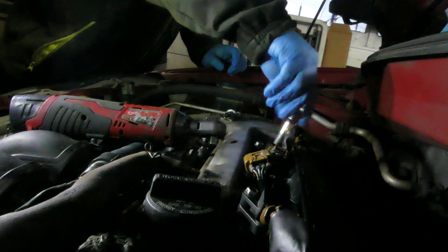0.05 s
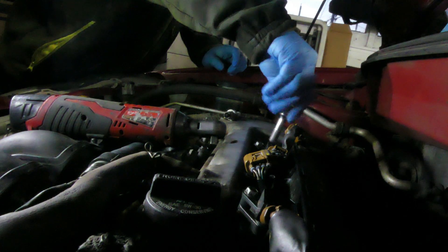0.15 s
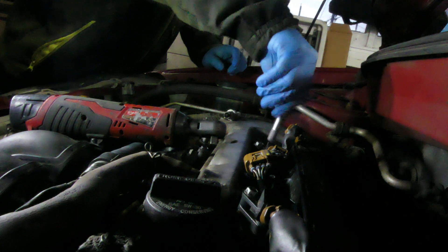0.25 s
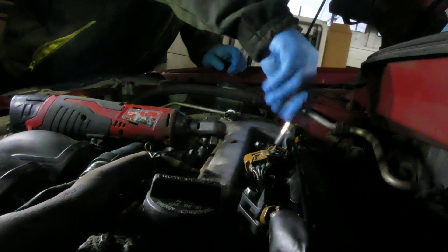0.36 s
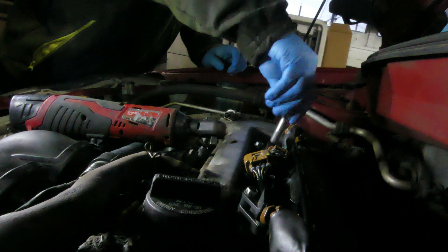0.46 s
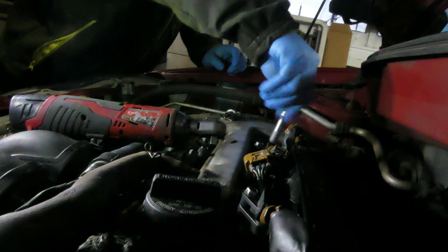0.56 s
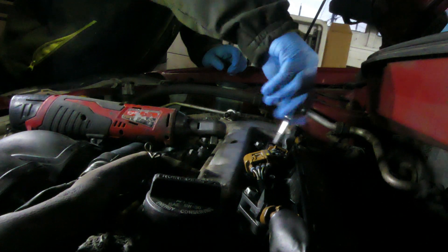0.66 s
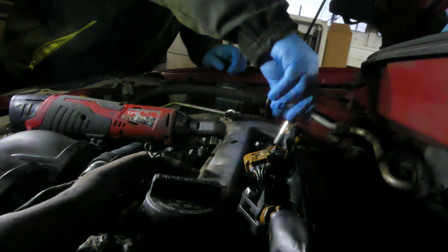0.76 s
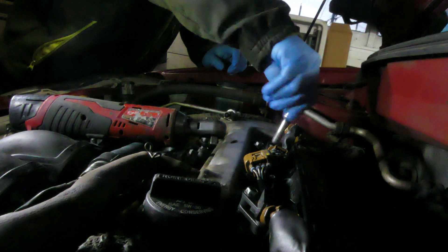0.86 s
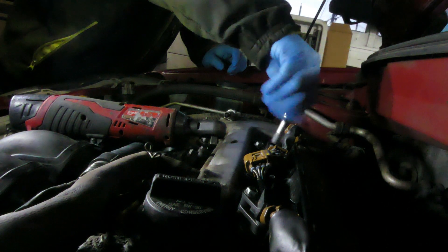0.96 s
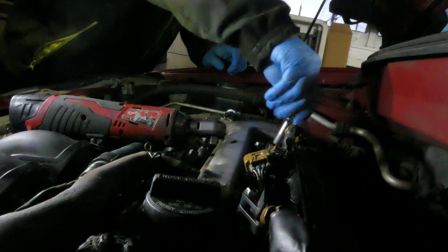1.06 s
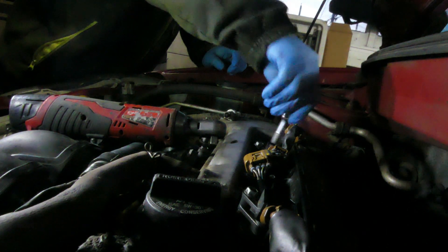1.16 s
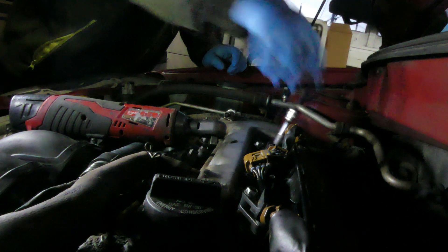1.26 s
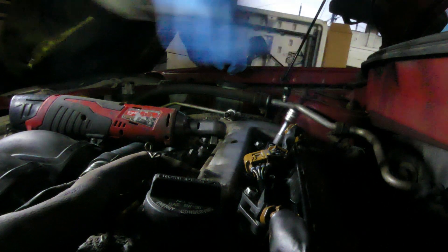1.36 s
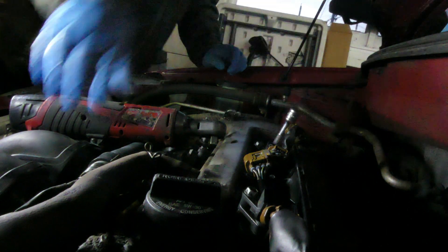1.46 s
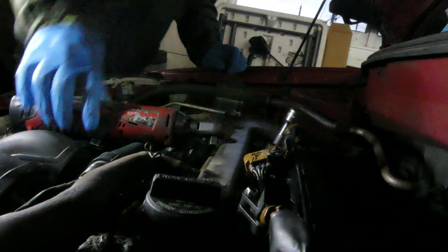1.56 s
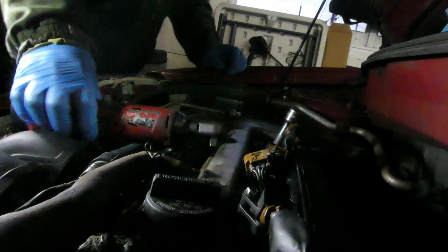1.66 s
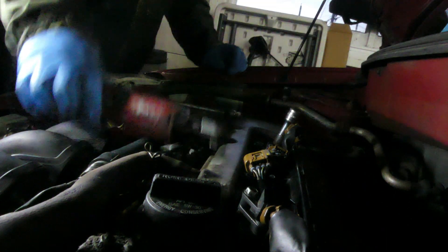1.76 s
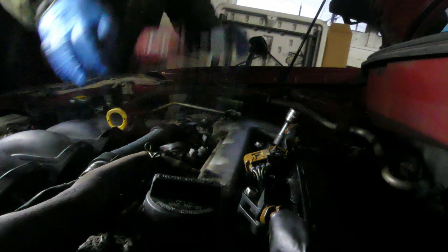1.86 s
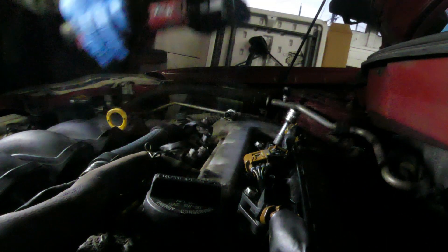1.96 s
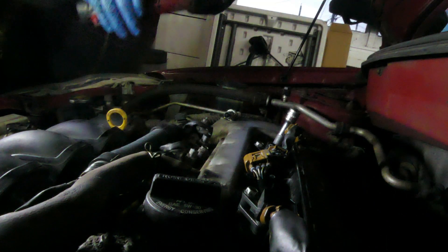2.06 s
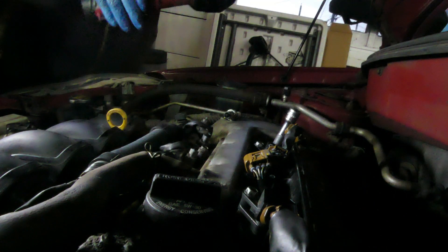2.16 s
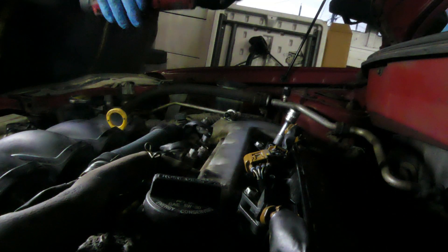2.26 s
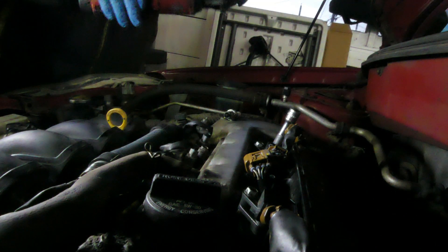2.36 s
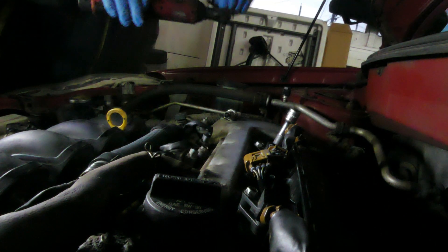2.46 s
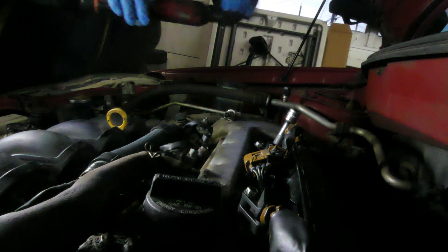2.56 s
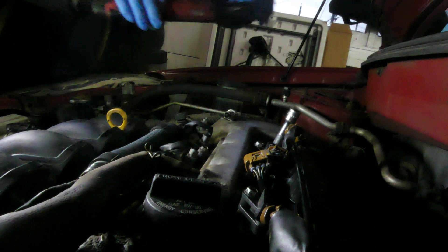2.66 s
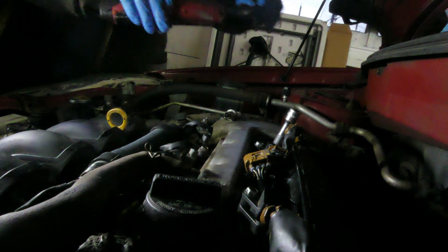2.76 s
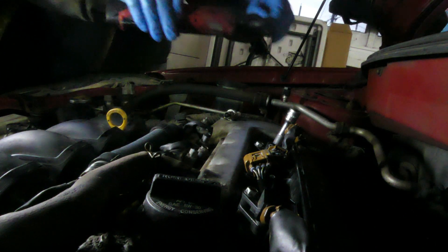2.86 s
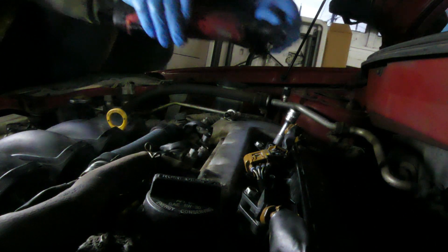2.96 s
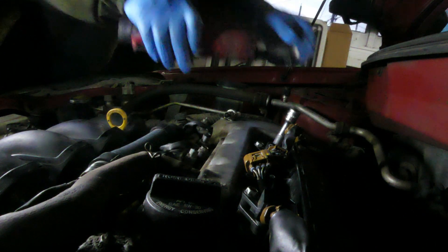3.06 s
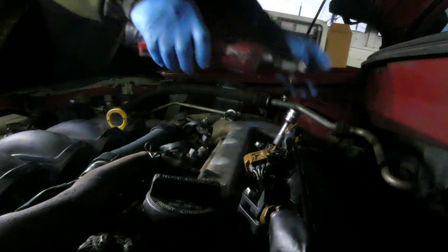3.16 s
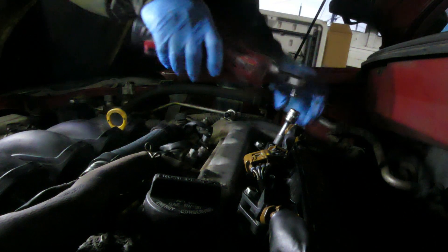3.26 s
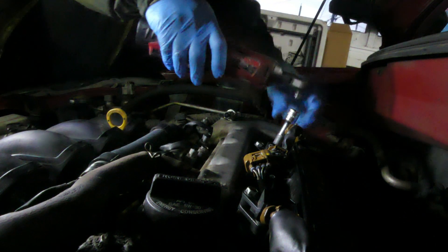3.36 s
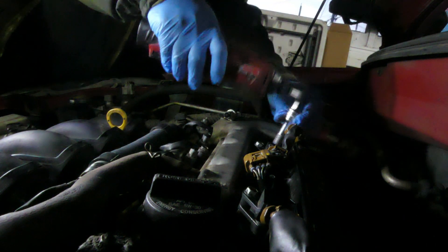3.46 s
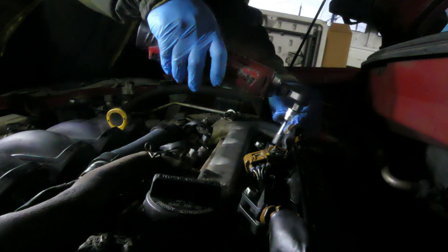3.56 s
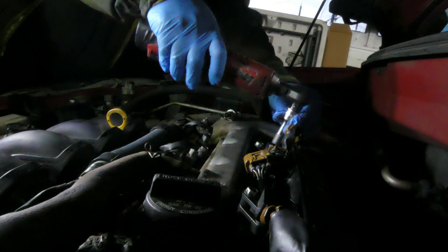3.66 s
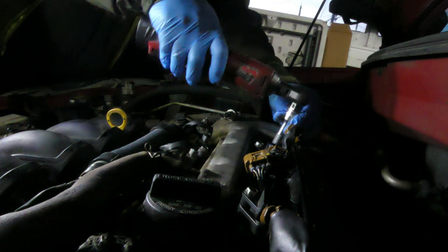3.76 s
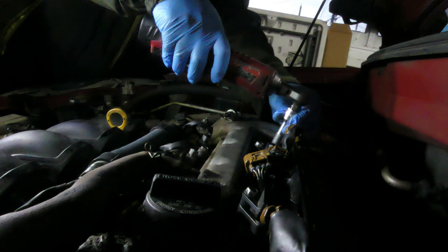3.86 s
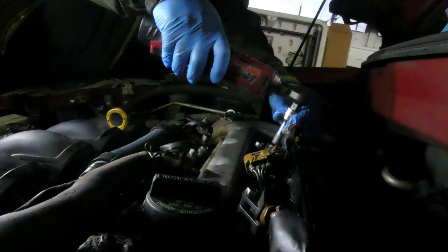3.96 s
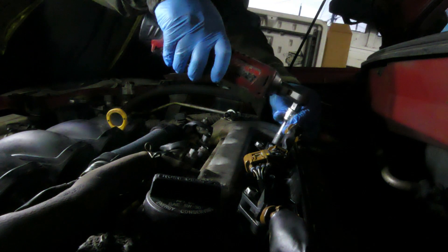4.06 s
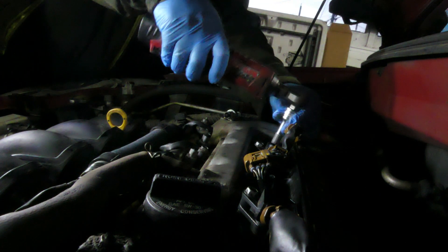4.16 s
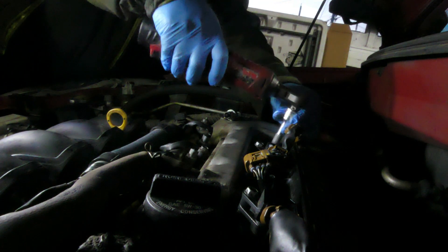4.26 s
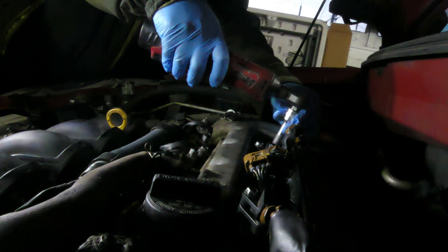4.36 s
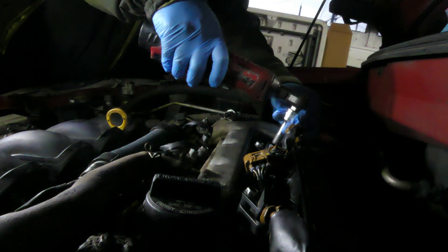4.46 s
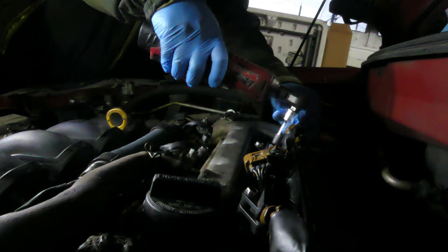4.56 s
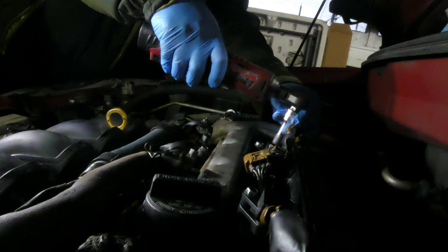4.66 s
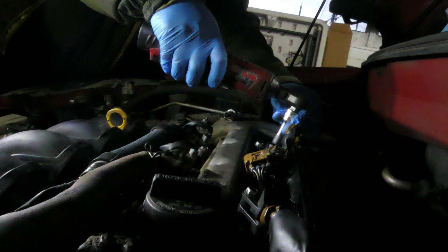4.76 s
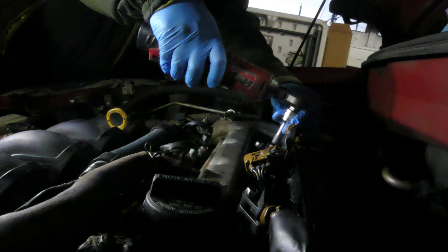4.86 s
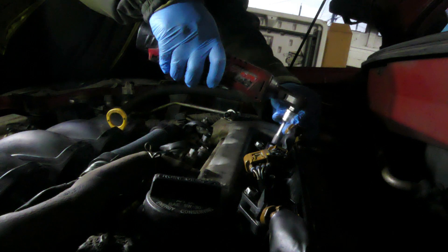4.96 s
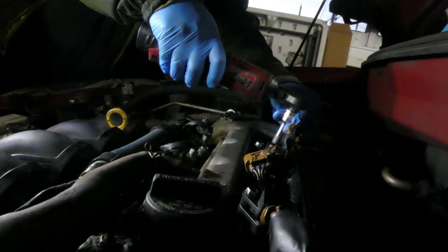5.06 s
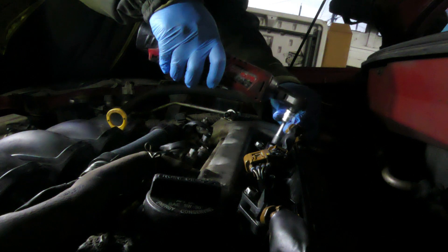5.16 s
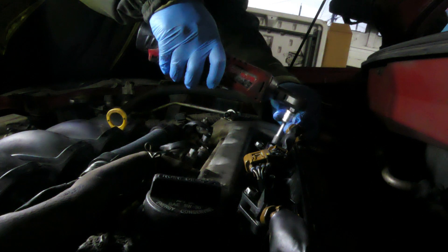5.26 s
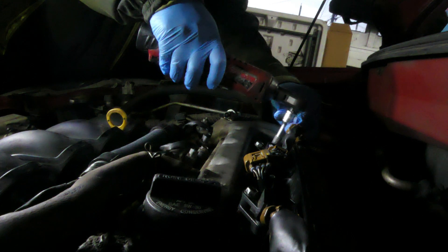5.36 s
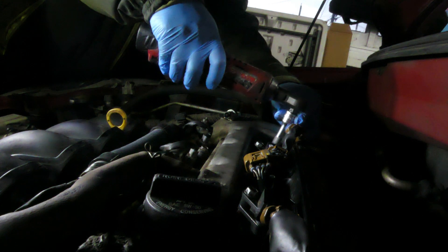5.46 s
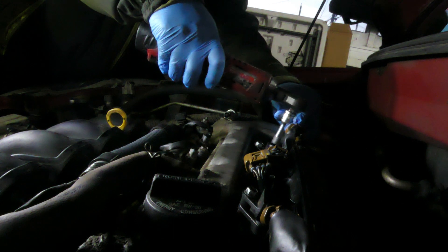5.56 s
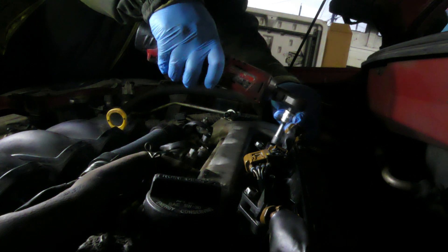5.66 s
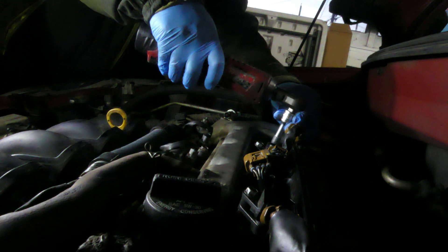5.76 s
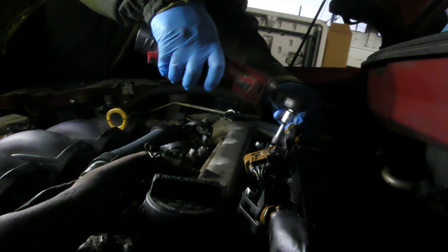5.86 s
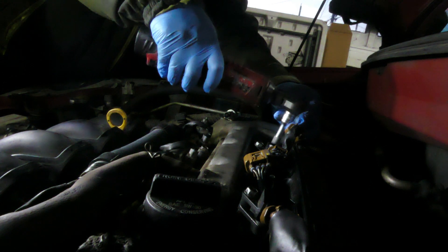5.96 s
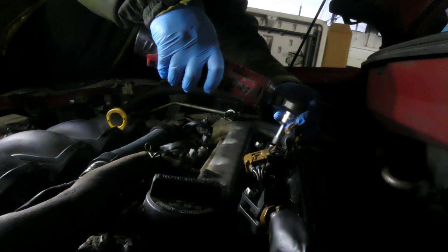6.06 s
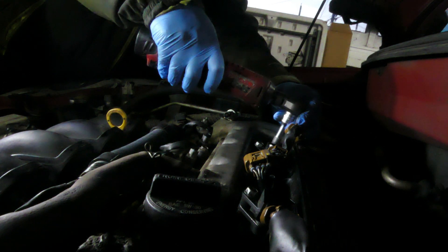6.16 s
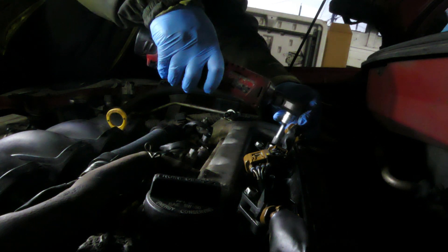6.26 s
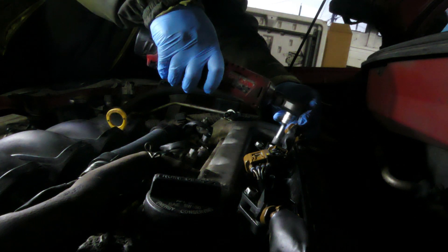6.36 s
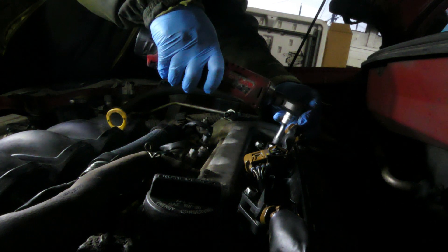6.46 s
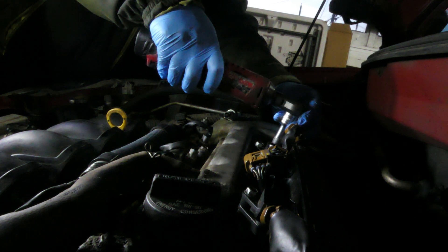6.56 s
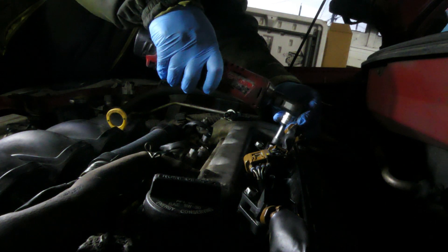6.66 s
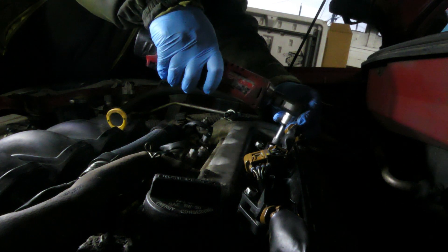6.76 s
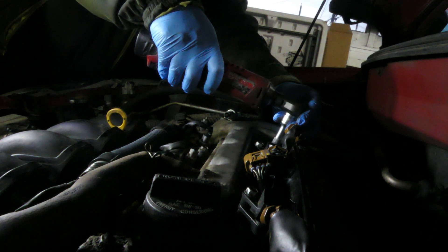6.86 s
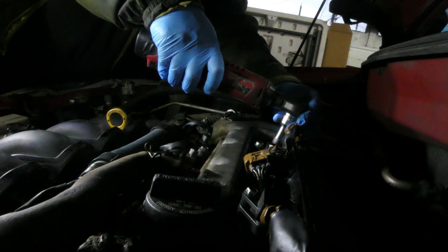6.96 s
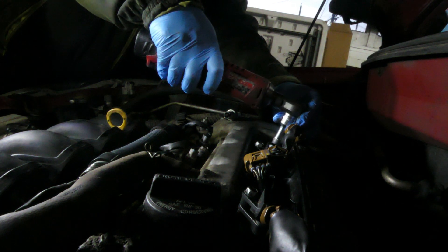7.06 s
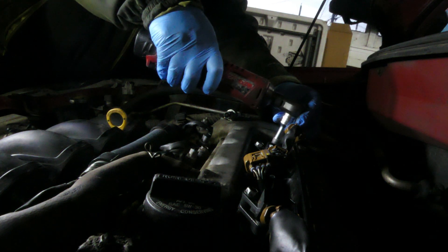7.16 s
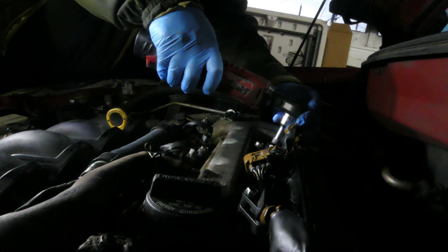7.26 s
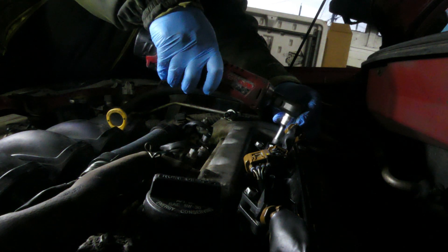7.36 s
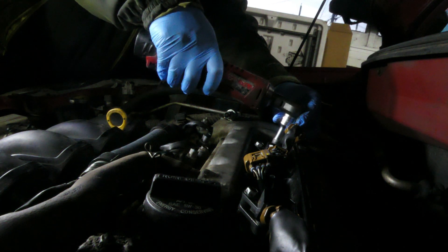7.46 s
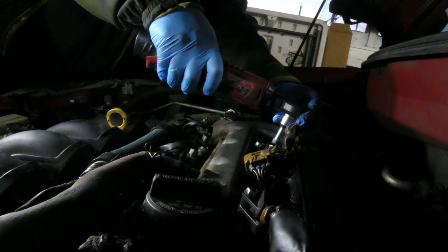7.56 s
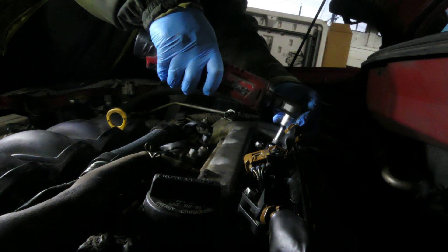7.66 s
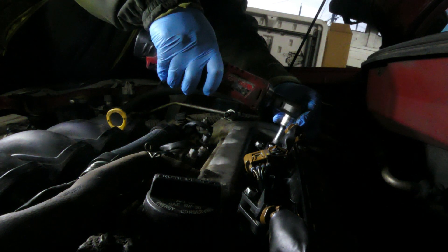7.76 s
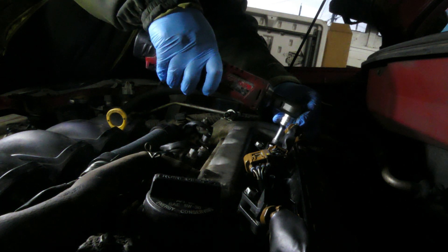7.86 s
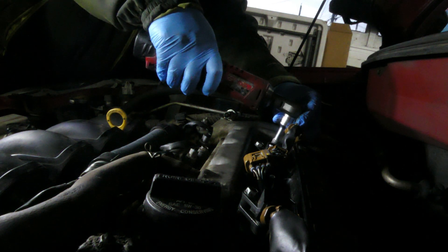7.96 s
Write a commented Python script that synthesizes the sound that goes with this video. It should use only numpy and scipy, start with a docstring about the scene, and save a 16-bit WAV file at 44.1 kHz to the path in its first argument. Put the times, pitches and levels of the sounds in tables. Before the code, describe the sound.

In a close garage engine bay, small metal taps give way to a handled power tool, a brief spin, then rattling, clicking ratchet drive.

```python
"""An engine bay in a garage: a spark plug is started by hand, then driven in by a cordless ratchet.
The socket extension clinks in its well as short steel rings; knocks, rubs and bumps are shaped noise and low notes.
The ratchet spins free and coasts to a stop, then drives the plug at a speed that follows the trigger finger.
Each crank turn clicks the pawl twice and jerks the extension, over grinding grains and whining motor orders.
Close reflections and a faint garage tail surround it all, over steady air noise."""
import sys
import numpy as np
from scipy import signal
from scipy.fft import rfft, irfft
from scipy.io import wavfile
from scipy.ndimage import uniform_filter1d

SR = 44100
rng = np.random.default_rng(int(sys.argv[2]) if len(sys.argv) > 2 else 0)


def pcm_store(signal):
    """Save signal as 16-bit PCM."""
    levels = np.round(np.clip(np.atleast_2d(signal), -1, 1) * 32767)
    wavfile.write(sys.argv[1], SR, levels.astype(np.int16).T)


N = 352800
T = np.arange(N) / SR
HZ = np.fft.rfftfreq(N, 1 / SR)

# moves of the trigger finger: (time [s], speed asked for, 0 when let go [crank turns/s], settling time [s])
TRIGGER_MOVES = [(3.2296, 73.3078, 0.0115), (3.336, 0.0, 1.0089), (4.1153, 78.85, 0.0451),
                 (4.2843, 0.0, 1.3228), (4.643, 60.724, 0.136), (5.1504, 45.095, 0.1741),
                 (5.2823, 0.0, 0.8363), (5.6154, 46.989, 0.0903), (5.9144, 49.361, 0.0898),
                 (6.161, 38.418, 0.1336), (6.6082, 37.605, 0.1314), (6.9089, 54.332, 0.1375),
                 (7.5054, 51.134, 0.0494), (7.8585, 48.3, 0.1003)]
# pawl clicks, swelling and easing: (time [s], relative level [dB])
PAWL_LEVEL_CURVE = [(3.24, -4), (3.26, 6.5), (3.43, 2), (3.62, -1), (3.73, 1), (3.83, -2), (3.88, 5),
                    (4.0, 0), (4.2, 0), (4.5, -5), (4.7, 2.5), (4.95, -6.5), (5.1, 1.5), (5.3, -6),
                    (5.55, -2.5), (5.65, -1), (6.4, -2), (7.1, 0), (8, -2)]
# the pawl snaps over as the direction is set: (time [s], relative level [dB])
DIRECTION_SNAP = (2.924, -1.6)
# colour of the pawl's ticks: (frequency [Hz], relative density [dB per Hz])
TICK_SPECTRUM = [(200, -57), (1000, -29), (4000, -31), (6200, -17), (8000, -25), (11700, -11), (12500, 1.5),
                 (13150, 2), (13800, -7), (16000, -18)]
# colour of the grinding gears: (frequency [Hz], relative density [dB per Hz])
GEAR_SPECTRUM = [(60, -36), (150, -21.5), (480, -8), (650, 0.5), (850, 6.5), (1130, -3.5), (1400, 4),
                 (2200, -3), (3500, 5), (5000, 3), (10000, 3.5), (15500, -2.5)]
# grinding as the thread runs freer or stiffer: (time [s], relative level [dB])
THREAD_GRINDING = [(4.5, 2.5), (5.0, -1), (5.8, 2.5), (6.3, 1.5), (7.4, 0.5), (7.9, 2)]
# colour of the jerks: (frequency [Hz], relative density [dB per Hz])
JOLT_SPECTRUM = [(100, -30), (400, -17), (800, -1.5), (1150, -5.5), (1900, -1.5), (2900, -2), (4000, 5.5),
                 (5100, -6), (6500, 15.5), (7600, -1), (11500, 8), (13200, 14), (15500, 3)]
# resonances of the tool housing: (frequency [Hz], width [Hz], boost [dB])
HOUSING_MODES = [(658, 17, 3), (1940, 260, 4), (2500, 170, 5.5)]
# resonances of the extension under load: (frequency before wobble [Hz], width [Hz], relative level [dB])
EXTENSION_MODES = [(5742, 177, 2), (6340, 300, -5), (6960, 370, -6), (8070, 100, -12.5)]
# motor whine: (multiple of shaft speed [1], relative level spinning free [dB], relative level driving [dB])
WHINE_ORDERS = [(3, -42.5, -48), (12, -41.5, -50)]
# how well the housing radiates the whine: (frequency [Hz], gain [dB])
WHINE_RADIATION = [(330, -26), (480, -11), (640, 0), (780, 4), (950, -5), (1200, -9), (1550, 3), (2000, -8),
                   (2350, -3), (2750, -7), (3200, 4), (3700, -6)]
# the speed controller sings as the rotor is about to move: (time [s], length [s], level of each tone [dB])
CONTROLLER_SQUEALS = [(3.194, 0.036, -42.5), (4.09, 0.029, -49)]
# the extension clinks in the plug well, each time at another spot: (time [s], low ring [Hz],
# low ring relative level [dB], body relative level [dB], top ring [Hz], top ring relative level [dB])
WELL_CLINKS = [(0.1, 5960, -51, -52.5, 7000, -60), (0.173, 5660, -50, -51, 6920, -59),
               (0.3012, 5730, -47.5, -66, 6520, -64), (0.398, 5800, -48, -50, 7130, -53),
               (0.4483, 5730, -43.5, -51.5, 6400, -53), (0.473, 5540, -47, -68, 7130, -44.5),
               (0.625, 5600, -41, -48.5, 7960, -38), (0.633, 5670, -38.5, -56, 7040, -49),
               (0.6933, 5600, -34.5, -59, 6330, -59), (0.729, 5840, -47, -41, 6700, -55),
               (0.8054, 5650, -39, -50, 6520, -58), (0.892, 5760, -38, -49, 7010, -45),
               (1.041, 5600, -30, -49, 7040, -49), (1.068, 5650, -36, -51, 7120, -34.5),
               (1.3093, 5580, -45, -52, 8510, -53)]
# fainter taps while the plug is turned by hand: (end [s], average rate [taps/s], highest relative level [dB])
THREADING_TAPS = (1.25, 8, -51)
# the tool is lifted, gripped and seated:
# (time [s], middle relative level [dB], low relative level [dB], high relative level [dB])
TOOL_KNOCKS = [(1.493, -43.5, -34.5, -63), (1.552, -52, -50, -40.5), (1.7553, -11, -19, -21),
               (1.77, -20, -31, -34), (1.98, -37.5, -39.5, -52), (2.0296, -26, -53, -37),
               (2.54, -33, -66, -56), (2.566, -39, -69, -52), (2.7008, -40, -50, -33.5),
               (2.9228, -31.5, -47.5, -28), (3.03, -32, -51, -41), (3.051, -34, -50, -41),
               (3.1368, -33.5, -48, -49), (3.2364, -27, -33, -38), (3.5336, -25.5, -33, -30),
               (3.86, -34, -34.5, -46), (4.043, -37.5, -44, -49)]
# sleeve and gloves move:
# (time [s], length [s], rustle relative level [dB], dull bumping relative level [dB])
CLOTH_RUBS = [(-.3, 5.1, -59, -68.5), (1.462, 0.42, -61, -55.5), (1.609, 0.085, -60, -61),
              (1.764, 0.14, -49, -55), (1.87, 0.18, -53.5, -47.5), (2.134, 0.067, -54, -61),
              (3.04, 0.55, -54, -62.5)]
# the tool drags over the engine cover, then along the sleeve: (time [s], length [s], relative level [dB])
TOOL_SCRAPES = [(1.612, 0.074, -46.5), (1.996, 0.38, -62)]
# colour of the brushing cloth: (frequency [Hz], relative density [dB per Hz])
CLOTH_SPECTRUM = [(200, -6.5), (500, 2.5), (850, -0.5), (1300, -2.5), (2000, -1.5), (4000, -5.5),
                  (8000, -9), (15000, -9.5)]
# the tool bumps on hoses and covers: (time [s], pitch [Hz], relative level [dB], decay by 60 dB [s])
SOFT_THUMPS = [(1.612, 443, -36.5, 0.14), (1.903, 216, -38, 0.24), (1.925, 260, -48, .12)]
# decay of the garage tail: (frequency [Hz], decay by 60 dB [s])
ROOM_DECAY = [(200, 0.062), (1000, 0.26), (4000, 0.19), (13000, 0.033)]
# colour of the garage air: (frequency [Hz], relative density [dB per Hz])
AIR_SPECTRUM = [(20, -36), (55, -14), (120, -2.5), (200, 3), (277, -0.5), (363, 5), (863, -9.5),
                (1940, -5.5), (2160, -14), (2990, -16), (5570, -17.5), (7710, -20.5), (13200, -19.5),
                (16000, -40)]
# extra stereo width: (frequency [Hz], side level relative to the middle [dB])
STEREO_WIDTH = [(500, -32), (1200, -15), (5500, -50), (8000, -13.5), (13000, -12)]

# bearing friction slows the coasting crank [turns/s, each second]; drag time
FRICTION, DRAG_S = 53.968, 1
# the socket takes up the plug, and bites hardest just then
ENGAGE_S, ENGAGE_RISE_S = 4.145, 0.023
BITE_DB, BITE_S = 2.5, 0.025
# loudness grows with speed and levels off above the knee [turns/s]
KNEE_SPEED, SPEED_POWER = 26.4, 2.38
# half of the full strain comes at this pull [turns/s, each second]
STRAIN_PULL, STRAIN_LAG_S = 180, 0.012
# the faster the crank, the less far the pawl drops [dB per turn/s]
PAWL_DB_PER_SPEED = -0.2009
GEAR_RATIO = 4.4  # motor shaft turns per crank turn


def crank_speed():
    """The crank settles towards the speed that the trigger asks for; let go, it coasts against drag and friction."""
    speed = np.zeros(N)
    for s, asked, settle_s in TRIGGER_MOVES:
        at = round(s * SR)
        aim = asked or -FRICTION * settle_s  # coasting heads below zero and is stopped there
        speed[at:] = aim + (speed[at] - aim) * np.exp(-(T[at:] - s) / settle_s)
    return np.maximum(speed, 0)


def pace(speed):
    """Loudness of the moving parts at a speed, 0-1."""
    return np.tanh(speed / KNEE_SPEED) ** SPEED_POWER


def strain(speed):
    """How hard the motor pulls against friction, drag and inertia, 0-1: least when coasting, most speeding up."""
    pull = np.maximum(np.gradient(speed, T) + FRICTION + speed / DRAG_S, 0)
    pull = fade(pull, STRAIN_LAG_S) / (STRAIN_LAG_S * SR)
    return pull / (pull + STRAIN_PULL)


def engaged():
    """0 while the ratchet spins free, 1 once it drives the plug."""
    return np.clip((T - ENGAGE_S) / ENGAGE_RISE_S, 0, 1)


def bite():
    """Extra gain that dies away just after the socket engages."""
    since = np.maximum(T - ENGAGE_S - ENGAGE_RISE_S, 0)
    return amp(BITE_DB * engaged() * np.exp(-since / BITE_S))


def strikes(turns, phase, jitter_s, spread_db):
    """One impulse each time the crank passes a phase, a little off in time and size."""
    at = np.flatnonzero(np.diff(np.floor(turns - phase)) > 0)
    late, size = rng.standard_normal((len(at), 2)).T
    out = np.zeros(N)
    out[np.clip(at + (late * jitter_s * SR).astype(int), 0, N - 1)] = amp(spread_db * size)
    return out


def pawl(turns, speed, db=4.5, second_db=-4, lift_db=-15, lead=.05, uneven_db=1.2,
         chatter_db=-18, chatter_s=0.0033, ring_db=-33, ring_s=0.0081, snap_ring_db=-42, snap_s=0.032):
    """The pawl lifts with a tick, drops over two teeth, chatters and rings; under load it drops a little sooner."""
    turns = turns + lead * engaged()
    drops = strikes(turns, 0, 0.00021, uneven_db)
    drops += amp(second_db) * strikes(turns, .16, 0.00044, uneven_db)
    drops += amp(lift_db) * np.sqrt(pace(speed)) * strikes(turns, .83, 0.00043, uneven_db)
    drops *= amp(PAWL_DB_PER_SPEED * speed + np.interp(T, *np.transpose(PAWL_LEVEL_CURVE)))
    snap = np.zeros(N)
    add(snap, DIRECTION_SNAP[0], amp([DIRECTION_SNAP[1]]))
    hits = drops + snap
    force = hits + amp(chatter_db) * fade(hits, chatter_s) * grit(9000, 0.76)
    tail = amp(ring_db) * fade(hits, ring_s) + amp(snap_ring_db) * fade(snap, snap_s)
    hiss = unit(band(band(rng.standard_normal(N), 11900, 13600), 11860, 13700))
    return amp(db) * (colour(force, read(TICK_SPECTRUM, HZ)) + tail * hiss)


def gears(turns, speed, free_db=-31, driving_db=-32.5, free_strain_db=4, strain_db=6.5, swing=0.17,
          uneven_db=1, teeth_per_s=8000, patchy_db=1.5):
    """Teeth grind inside the housing, hardest in the middle of the power stroke and when the motor pulls."""
    stroke = (1 + swing * np.cos(2 * np.pi * (turns - .45))) * wander(uneven_db, 2.2, 34)
    pull, load = strain(speed), engaged()
    free = (1 - load) * (free_db + free_strain_db * pull)
    driving = load * (driving_db + strain_db * pull)
    effort = pace(speed) * bite() * amp(free + driving)
    grain = grit(teeth_per_s, 0.66) * amp(np.interp(T, *np.transpose(THREAD_GRINDING)))
    return patchy(colour(grain * stroke * effort, housing(GEAR_SPECTRUM)), patchy_db)


def rattle(turns, speed, jolt_db=-32.0, ring_db=-35.0, strain_db=2, touch_db=-7, rebound_db=-11,
           free_trim_db=-4, drift_db=0.98, uneven_db=1.1, rise_s=.0012, settle_s=.0019, patchy_db=1.2):
    """Power strokes jerk the loose socket and extension, which rebound and ring; spinning free, the yoke knocks."""
    blows = amp(touch_db) * strikes(turns, 0.328, 0.00071, uneven_db)
    blows += strikes(turns, 0.448, 0.00052, uneven_db)
    blows += amp(rebound_db) * strikes(turns, 0.662, 0.0021, uneven_db)
    play = strikes(turns, 0.065, 0.00035, uneven_db) + strikes(turns, .29, 0.00044, uneven_db)
    contact, loose = (fade(fade(x, settle_s), rise_s) for x in (blows, play))
    effort = pace(speed) * bite() * amp(strain_db * strain(speed)) * wander(drift_db, 2.63, 6.0)
    effort /= np.sqrt(np.mean(contact[T > ENGAGE_S] ** 2))
    force = engaged() * contact * effort
    idle = amp(free_trim_db) * (1 - engaged()) * loose * effort / 2
    grain = grit(9000, .5)
    jolt = colour((force + idle) * grain, housing(JOLT_SPECTRUM))
    ringing = ring(force * grain[::-1])  # reversed grain keeps the two layers unlike
    return patchy(amp(jolt_db) * jolt + amp(ring_db) * ringing, patchy_db)


def ring(x):
    """The modes of the extension shift a little as it wobbles in the socket."""
    wobble = wander(.07, 8, 50)
    modes = sum(amp(db) * resonate(x, hz * wobble, width) for hz, width, db in EXTENSION_MODES)
    return band(modes, 4400, 9900)


def housing(spectrum):
    """A spectrum in dB with the resonances of the tool housing on top."""
    peaks = sum(db / (1 + (2 * (HZ - hz) / width) ** 2) for hz, width, db in HOUSING_MODES)
    return read(spectrum, HZ) + peaks


def motor(turns, speed, sag=0.0099, pace_power=0.83, waver=.32):
    """Shaft orders whine, loudest on housing resonances; under load the rotor slows on every power stroke."""
    shaft = GEAR_RATIO * (turns + sag * engaged() * np.sin(2 * np.pi * turns) / (2 * np.pi))
    out = np.zeros(N)
    for order, free_db, driving_db in WHINE_ORDERS:
        flutter = 1 + waver * unit(band(rng.standard_normal(N), 2.9, 38))
        db = free_db + engaged() * (driving_db - free_db)
        db += read(WHINE_RADIATION, order * GEAR_RATIO * speed)
        out += amp(db) * flutter * np.sin(2 * np.pi * (order * shaft + rng.random()))
    out *= pace(speed) ** pace_power
    for s, length, squeal_db in CONTROLLER_SQUEALS:
        t = np.arange(int(length * SR)) / SR
        swell = t / length * signal.windows.tukey(len(t), .2)
        tones = sum(np.sin(2 * np.pi * k * 1870 * t) for k in (2, 3))  # harmonics of a missing fundamental
        add(out, s, amp(squeal_db) * swell * tones)
    return out


def clinks(ring_db=3, body_db=4, top_db=5, clack_trim_db=-6, width_hz=230, contact_s=0.0025, body_s=0.0085):
    """The extension taps the well: a broad clack, two short rings that depend on the spot, and the engine cover."""
    until_s, per_s, faint_db = THREADING_TAPS
    taps = (rng.random(N) < per_s / SR) * (T < until_s)
    low, body, top = amp(faint_db) * rng.random((3, N)) * taps
    for s, _, low_level, body_level, _, top_level in WELL_CLINKS:
        add(low, s, amp([low_level]))
        add(body, s, amp([body_level]))
        add(top, s, amp([top_level]))
    times, low_hz, _, _, top_hz, _ = np.transpose(WELL_CLINKS)
    latest = np.maximum(np.searchsorted(times, T) - 1, 0)  # the rings keep the pitch of the latest clink
    low, top = (fade(x, contact_s) * grit(10000, .5) for x in (low, top))
    steel = amp(ring_db) * resonate(low, low_hz[latest], width_hz)
    steel += amp(top_db) * resonate(top, top_hz[latest], width_hz)
    clack = amp(clack_trim_db) * 2 * band(low + 2 * top, 4700, 7600)
    cover = amp(body_db) * fade(body, body_s) * unit(band(rng.standard_normal(N), 920, 2050))
    return steel + clack + cover


def knocks(low_db=4, mid_db=0, high_db=4, mid_t60_s=0.029, low_hold=1.3, high_hold=0.58,
           tail_db=-20, tail_t60_s=0.18, rise_s=0.0016):
    """Plastic and metal parts knock together: a short burst in three registers with a brief rattling tail."""
    t, out = np.arange(SR // 5) / SR, np.zeros(N)
    for s, mid, low, high in TOOL_KNOCKS:
        a, b, c = rng.standard_normal((3, len(t)))
        # the holds stretch or shorten the decay of the low and high registers against the middle one
        burst = amp(low_db + low - 60 * t / (mid_t60_s * low_hold)) * unit(band(a, 386, 1100))
        mid_decay = amp(-60 * t / mid_t60_s) + amp(tail_db - 60 * t / tail_t60_s)
        burst += amp(mid_db + mid) * mid_decay * unit(band(b, 1150, 4600))
        burst += amp(high_db + high - 60 * t / (mid_t60_s * high_hold)) * unit(band(c, 4400, 12400))
        add(out, s, burst * (1 - np.exp(-t / rise_s)))
    return out


def handling(rustle_db=-1, bump_db=-1):
    """Sleeve and gloves brush the engine; the tool scrapes and bumps as it is lifted."""
    brush = sum(amp(db) * arch(s, length) for s, length, db, _ in CLOTH_RUBS)
    bump = sum(amp(db) * arch(s, length) for s, length, _, db in CLOTH_RUBS)
    drag = sum(amp(db) * arch(s, length) for s, length, db in TOOL_SCRAPES)
    slips = grit(4000, 1.0) * wander(1.1, 25, 127)
    rustle = colour(slips * brush, read(CLOTH_SPECTRUM, HZ))
    scrape = drag * unit(band(slips[::-1], 540, 2300))
    dull = bump * unit(band(rng.standard_normal(N), 136, 550))
    return amp(rustle_db) * rustle + scrape + amp(bump_db) * dull


def arch(s, length, top=0.18, sharp=0.83):
    """One rub swells quickly and fades: share of its length at the top, and how pointed it is."""
    return np.sin(np.pi / 2 * np.interp((T - s) / length, [0, top, 1], [0, 1, 0])) ** sharp


def thumps(rise_s=0.0088, rough=0.5):
    """Soft blows: one low, quickly damped note each, roughened by slow noise."""
    t, out = np.arange(SR // 3) / SR, np.zeros(N)
    for s, hz, db, t60_s in SOFT_THUMPS:
        envelope = amp(db - 60 * t / t60_s) * (1 - np.exp(-t / rise_s))
        add(out, s, envelope * np.sin(2 * np.pi * hz * t))
    return out * (1 + rough * unit(band(rng.standard_normal(N), 10, 74)))


def space(x, bay_db, bay_t60_s, room_db=-16):
    """Close reflections from the engine bay and bonnet, then the faint garage tail, unlike in each ear."""
    t = np.arange(SR // 2) / SR
    echoes = rng.random((2, 2, len(t))) < 4000 / SR
    near, far = rng.standard_normal((2, 2, len(t))) * echoes
    near = near * amp(-60 * t / bay_t60_s) * (t > .0004)
    hz, s, z = signal.stft(far * (t > .008), SR, nperseg=256)
    decay = amp(-60 * s / read(ROOM_DECAY, hz)[:, None])
    far = signal.istft(z * decay, SR, nperseg=256)[1][:, :len(t)]
    response = (amp(bay_db) * unit(near) + amp(room_db) * unit(far)) / np.sqrt(len(t))
    return x + signal.fftconvolve(x[None], response, axes=1)[:, :N]


def garage(db=-60):
    """Steady air noise of the garage: coloured noise, unlike in each ear."""
    mid, side = (colour(rng.standard_normal(N), read(AIR_SPECTRUM, HZ)) for _ in range(2))
    return amp(db) * np.array([mid + side, mid - side])


def amp(db):
    """Decibels to gain."""
    return 10 ** (np.asarray(db) / 20)


def unit(x):
    """Scales to rms 1."""
    return x / np.sqrt(np.mean(x ** 2) + 1e-20)


def read(points, hz):
    """Reads a spectrum on a log-frequency axis."""
    f, value = np.transpose(points)
    return np.interp(np.log(hz + 1), np.log(f + 1), value)


def add(mix, s, sound):
    """Adds a sound at a time."""
    part = mix[max(round(s * SR), 0):][:len(sound)]
    part += sound[:len(part)]


def colour(x, db):
    """Causal minimum-phase filter of unit energy with the given dB shape."""
    cepstrum = irfft(np.log(unit(amp(db[::20]))))
    half = len(cepstrum) // 2
    cepstrum[1:half] *= 2  # folding the cepstrum puts the energy first
    cepstrum[half + 1:] = 0
    response = irfft(np.exp(rfft(cepstrum)))[:SR // 10]
    return signal.oaconvolve(x, response)[:N]


def band(x, lo_hz, hi_hz):
    """Band-pass."""
    sos = signal.butter(2, [lo_hz, min(hi_hz, SR / 2 - 1)], "band", fs=SR, output="sos")
    return signal.sosfilt(sos, x)


def resonate(x, hz, width):
    """A resonance of unit energy that can follow a moving frequency."""
    turn = np.exp(2j * np.pi * np.cumsum(hz * np.ones(N)) / SR)
    r = np.exp(-np.pi * width / SR)
    return 2 * (turn * signal.lfilter([np.sqrt(1 - r)], [1, -r], x / turn + 1e-18)).real


def fade(x, seconds):
    """Gives every impulse an exponential tail."""
    return signal.lfilter([1], [1, -np.exp(-1 / (seconds * SR))], x)


def grit(per_s, spread_db):
    """Dense tiny impacts of uneven size."""
    size = amp(spread_db * np.minimum(rng.exponential(1, N), 4))
    return unit(rng.standard_normal(N) * size * (rng.random(N) < per_s / SR))


def wander(db, lo_hz, hi_hz):
    """A gain that drifts at random."""
    return amp(db * unit(band(rng.standard_normal(N), lo_hz, hi_hz)))


def patchy(x, db, count=7):
    """Drifts the colour at random, in patches a few hundred Hz wide and a few crank turns long."""
    z = signal.stft(x, nperseg=512)[2]
    patches = uniform_filter1d(rng.standard_normal(z.shape), count - 2, 0)  # across frequency
    patches = unit(uniform_filter1d(patches, count * 2, 1))  # along time
    return signal.istft(z * amp(db * patches), nperseg=512)[1][:N]


def scene():
    """Crank speed drives the whole ratchet; tool and hands sit right of centre, each group with its own reflections."""
    speed = crank_speed()
    turns = np.cumsum(speed) / SR
    mechanism = pawl(turns, speed) + gears(turns, speed) + rattle(turns, speed)
    ratchet = space(mechanism, bay_db=-7, bay_t60_s=0.067)
    whine = space(motor(turns, speed), bay_db=-11, bay_t60_s=.09)
    hands = space(clinks() + knocks() + handling() + thumps(), bay_db=-5.5, bay_t60_s=.11)
    return (ratchet + whine + hands) * amp([[-.9], [0]]) + garage()


def record(dry, lag_s=0.000594, edge_hz=15950):
    """A narrow notch in both channels, a delayed side signal that widens the treble, then a steep upper band limit."""
    dry = signal.lfilter(*signal.iirnotch(7500, 45, SR), dry)
    # the phase of the side: one and a half lags of delay, and a sine that smears it in time
    phase = 2 * np.pi * HZ * lag_s + 4 * np.pi * np.sin(HZ / 1100)
    turn = np.exp(-1j * phase / 2 - 2j * np.pi * HZ * lag_s)
    side = irfft(rfft(dry.mean(0)) * amp(read(STEREO_WIDTH, HZ)) * turn, N)
    low_pass = signal.firwin(511, edge_hz, window=("kaiser", 9), fs=SR)
    return signal.oaconvolve(dry + np.array([side, -side]), low_pass[None], "same")


dry = scene()
out = record(dry)
pcm_store(out)
```